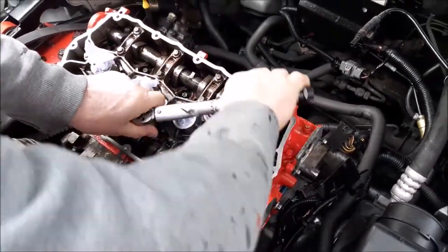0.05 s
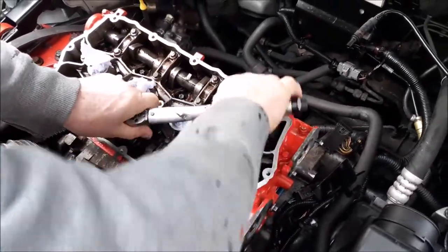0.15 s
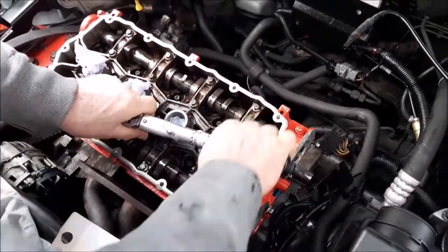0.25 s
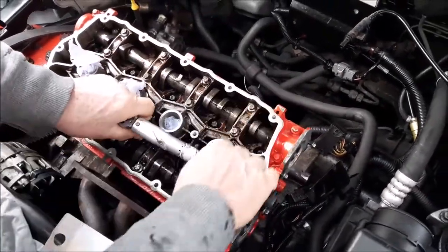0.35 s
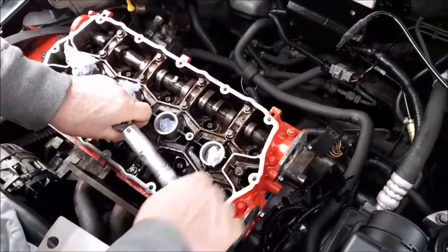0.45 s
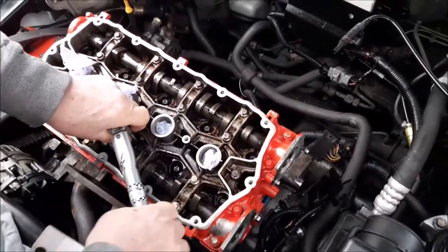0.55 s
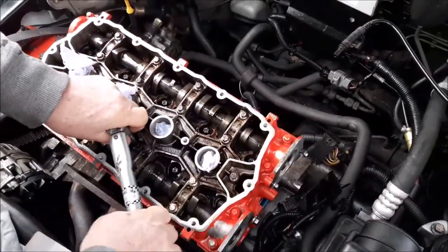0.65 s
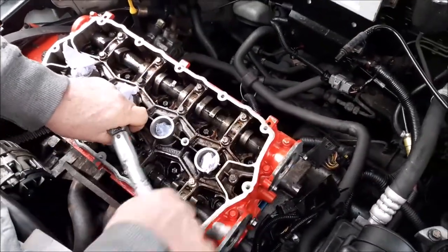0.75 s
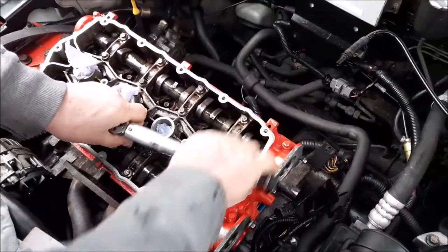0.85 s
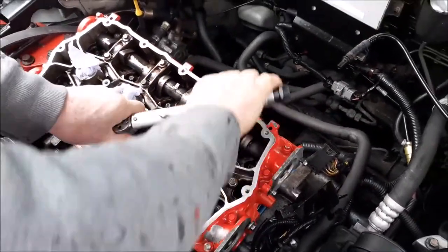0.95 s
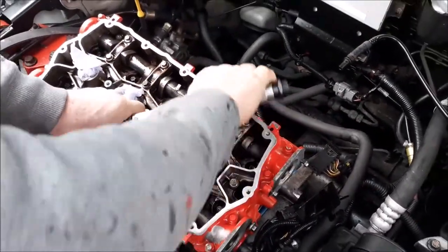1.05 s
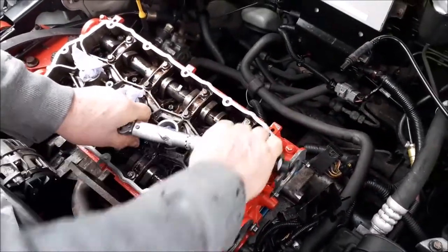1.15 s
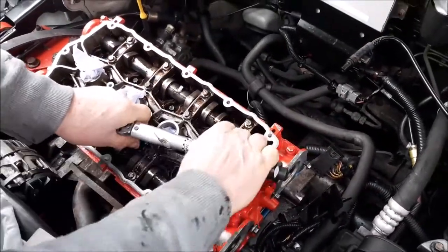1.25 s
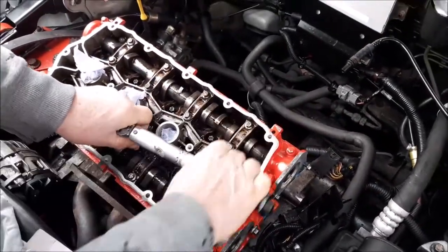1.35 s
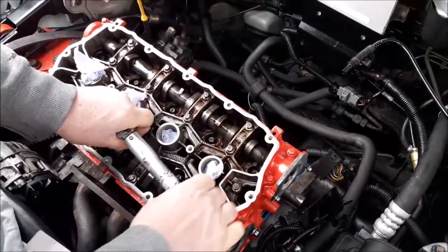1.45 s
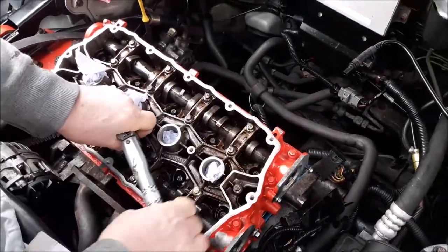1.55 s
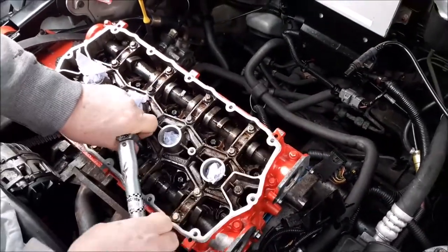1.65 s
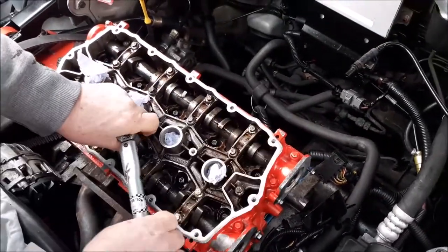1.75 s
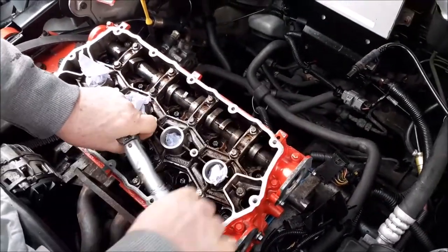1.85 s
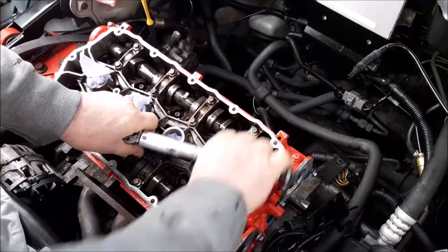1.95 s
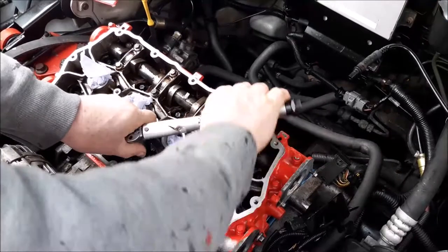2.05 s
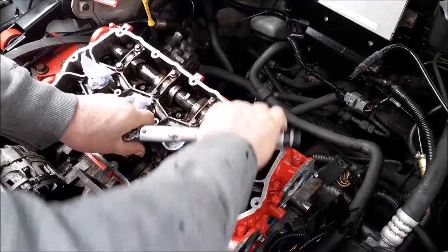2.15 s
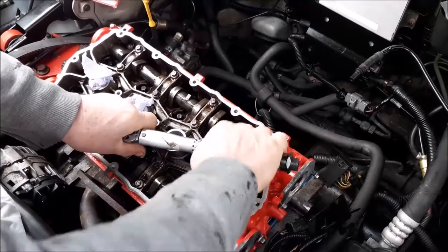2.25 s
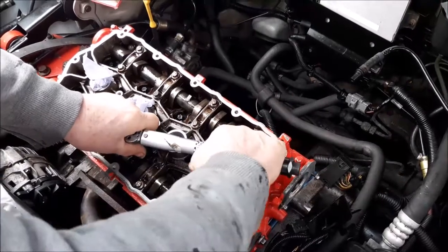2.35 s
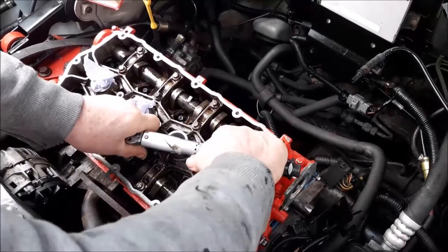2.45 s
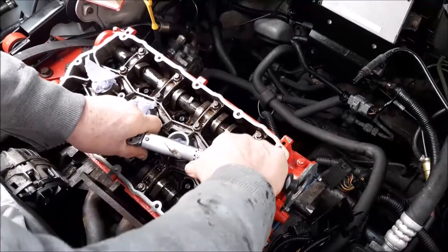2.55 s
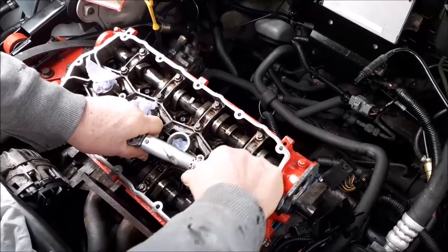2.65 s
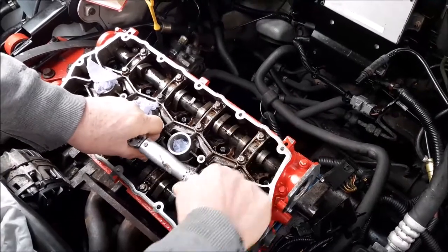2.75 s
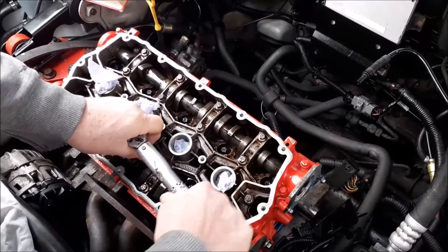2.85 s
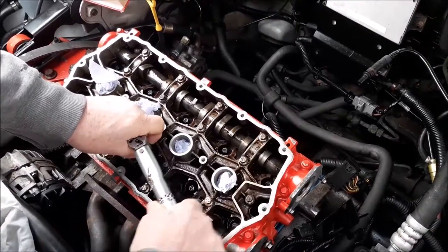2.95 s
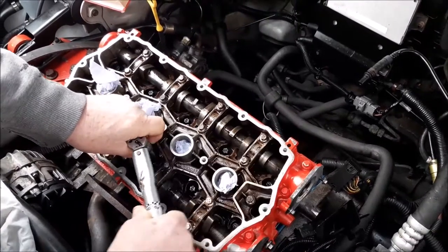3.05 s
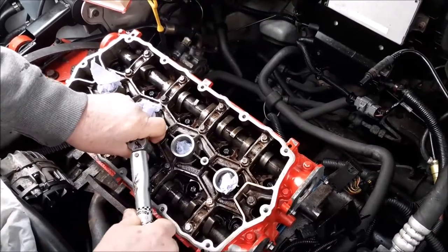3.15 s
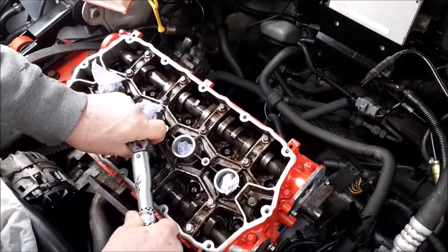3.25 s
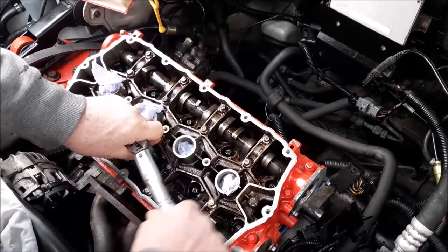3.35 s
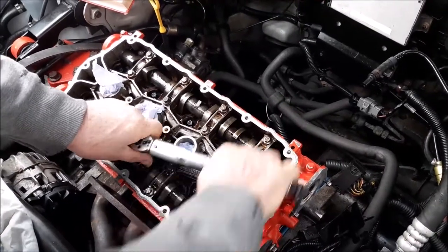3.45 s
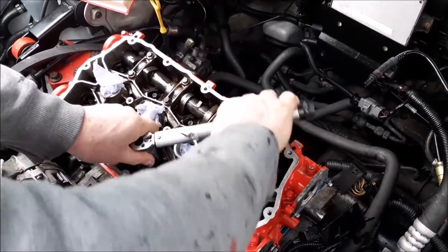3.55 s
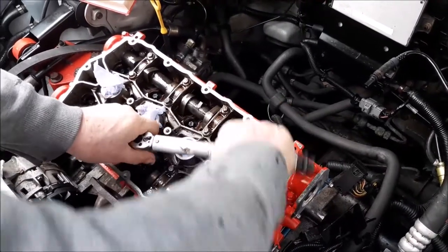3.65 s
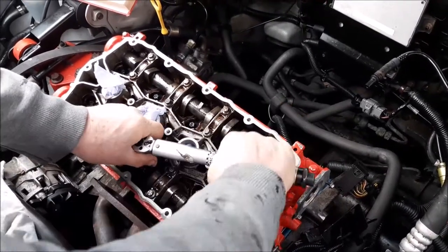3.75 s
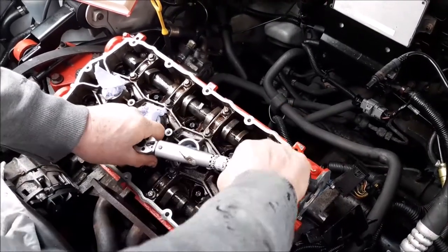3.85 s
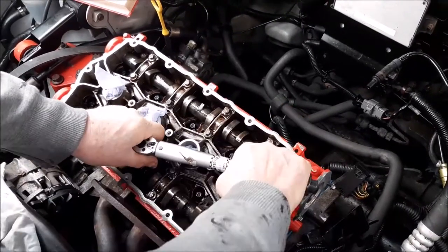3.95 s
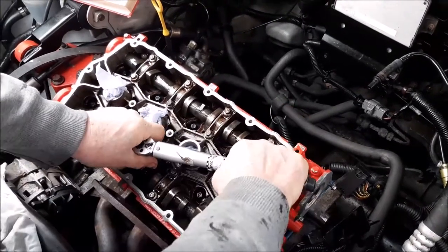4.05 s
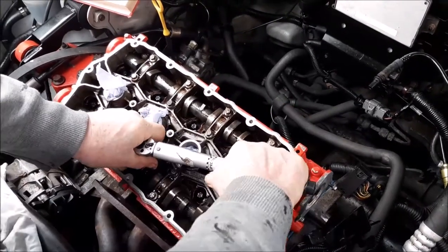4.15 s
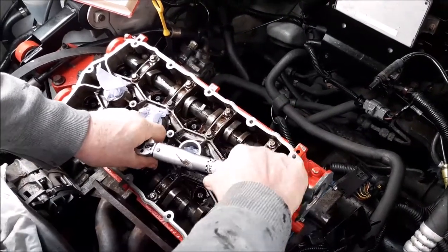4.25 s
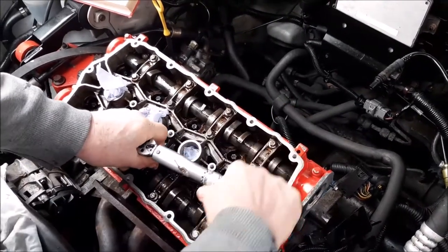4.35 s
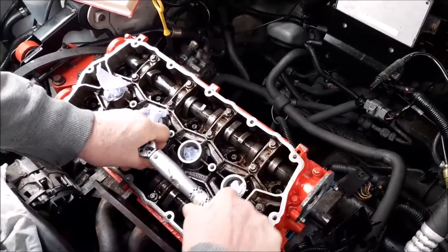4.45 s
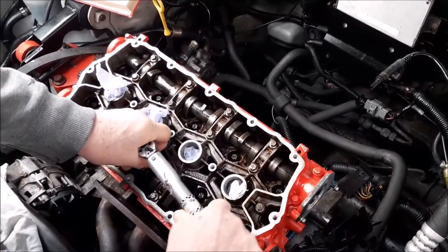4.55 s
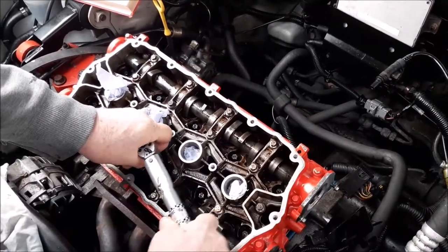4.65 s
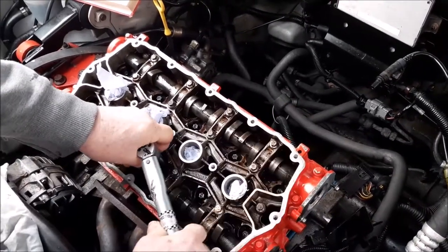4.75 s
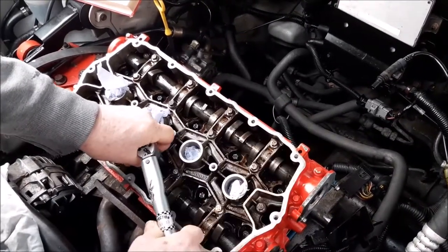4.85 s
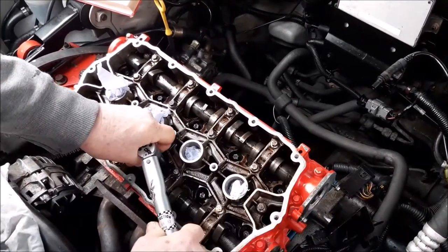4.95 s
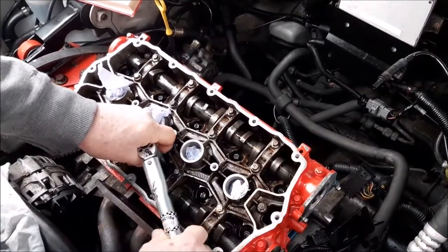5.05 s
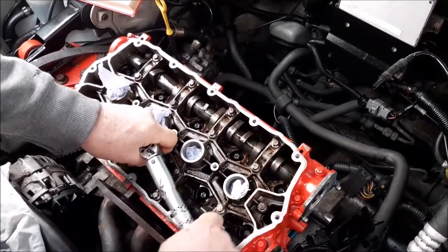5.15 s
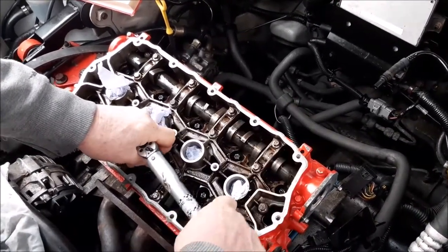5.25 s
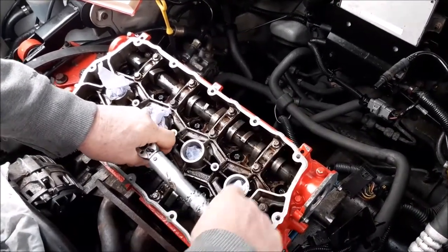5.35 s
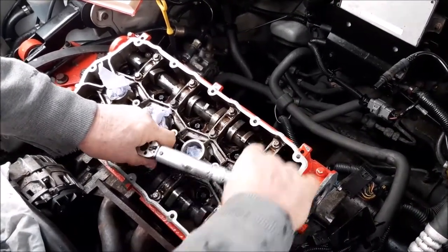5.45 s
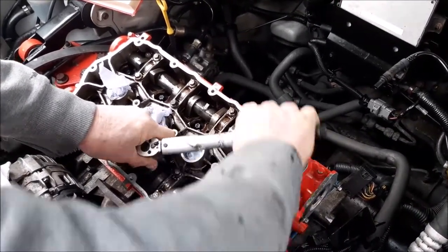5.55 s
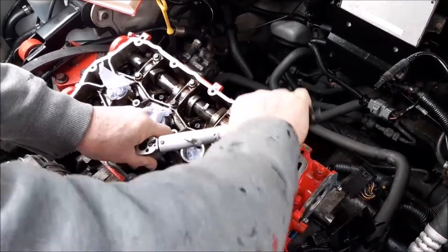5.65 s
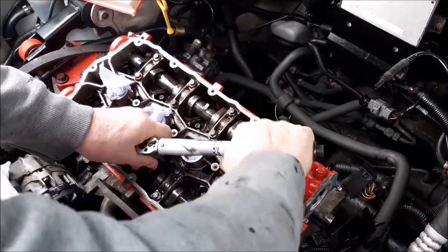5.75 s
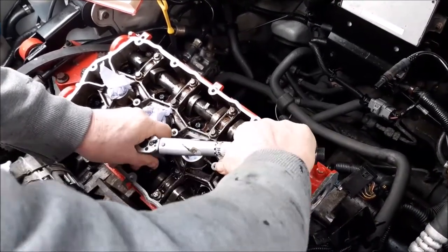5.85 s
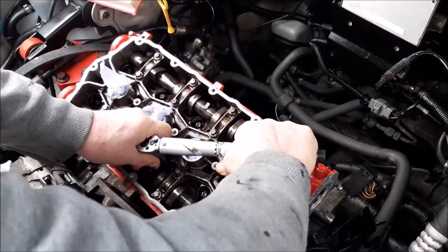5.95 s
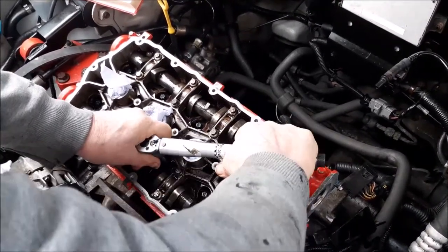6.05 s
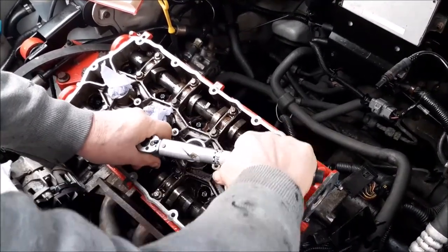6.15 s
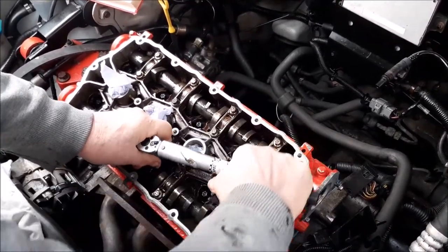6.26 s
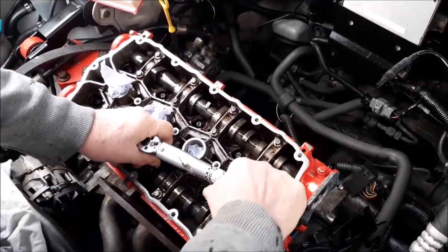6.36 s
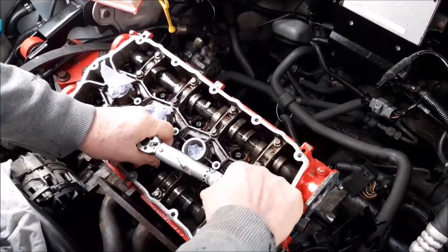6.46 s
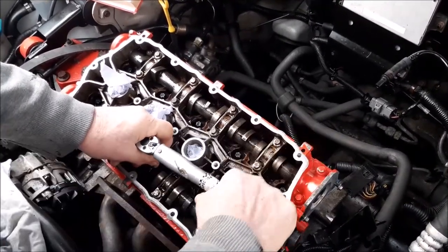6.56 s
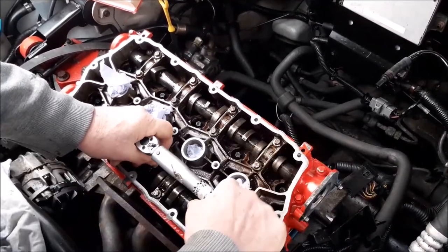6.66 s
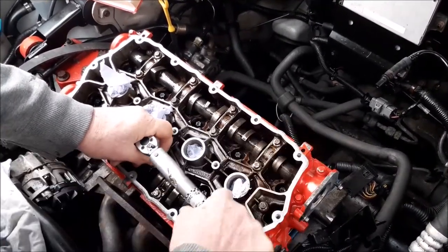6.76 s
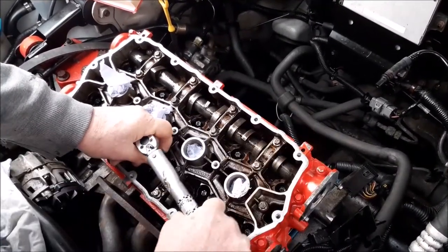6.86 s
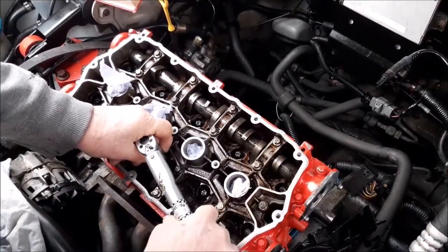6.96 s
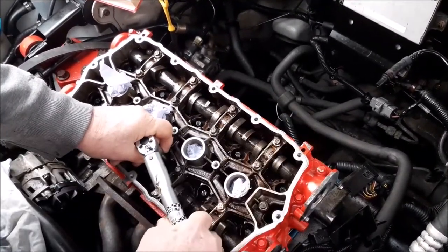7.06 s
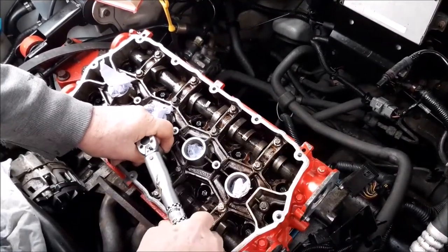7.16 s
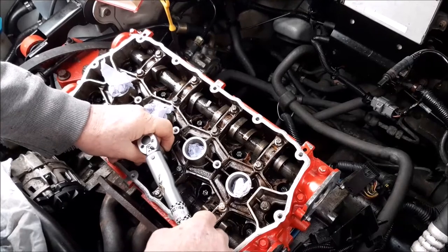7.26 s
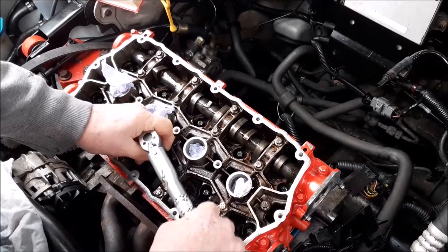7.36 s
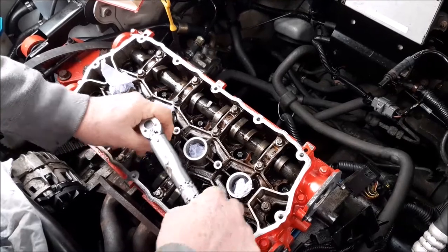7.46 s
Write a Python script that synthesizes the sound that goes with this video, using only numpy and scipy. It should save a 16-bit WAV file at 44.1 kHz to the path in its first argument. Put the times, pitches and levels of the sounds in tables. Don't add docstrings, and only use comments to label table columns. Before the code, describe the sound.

Two sharp ratchet clicks, a pause and a solid metal clunk, then four more clicks; the pattern of clicks and knocks repeats irregularly. Tiny socket ticks and scuffs fill the gaps over low car-body rumble and cloth rustle. The sound is close and slightly left, with only a short faint garage echo. Late on, a faint wavering motor tone swells beneath soft hiss, and one tiny tick ends it.

```python
import sys
import numpy as np
from scipy import signal
from scipy.fft import rfft, irfft
from scipy.io import wavfile
from scipy.ndimage import uniform_filter1d

SR = 44100
rng = np.random.default_rng(int(sys.argv[2]) if len(sys.argv) > 2 else 0)


def materialize(psi):
    bounded = np.clip(np.atleast_2d(psi).T, -1, 1)
    quanta = np.round(bounded * 32767).astype(np.int16)
    wavfile.write(sys.argv[1], SR, quanta)


def magnitude_from_level(level_db):
    exponent = np.asarray(level_db, float) / 20
    return 10 ** exponent


N = 330750

# start_s, peak_db, slip_db, bounce_db, top_ring_db
TOOTH_CLICKS = [(0.0247, -33.5, -11, -2.5, -9.5), (0.0772, -34.5, -7, -8, -10.5),
                (0.8602, -35, -15.5, -11, -5.5), (0.8968, -34, -13, -1, -9), (0.9377, -31, -12, -7.5, -8),
                (0.9815, -32.5, -9.5, 8, -8), (1.9346, -31.5, -12.5, -9, -9), (1.9735, -30, -10, 2.5, -4),
                (2.014, -29, -20, -11, -5), (2.0647, -32.5, -10.5, 1.5, -7), (3.4395, -32, -18, -3.5, -2.5),
                (3.474, -32.5, -12, -11, -6.5), (3.5119, -32, -8.5, 3, -8.5), (3.5543, -32, -10, -3.5, -7),
                (5.434, -36, -20, -15.5, -11), (5.4964, -33.5, -18, -10.5, -9),
                (5.5499, -33.5, -9.5, 0, -7.5), (5.6185, -36, -22, 2, -13)]
# start_s,
# peak_db, lower_body_db, chatter_s
SOCKET_TICKS = [(0.2663, -49, -18.5, 0.0083), (0.354, -67, -9, 0.02), (0.5797, -65, -6, 0.008),
                (0.6026, -63, -5, 0.024), (1.1722, -53, -15, 0.011), (1.177, -58.5, -19, 0.014),
                (1.225, -55, -14, 0.0036), (1.6829, -48.5, -16.5, 0.01), (1.837, -63, -26.5, 0.02),
                (1.9008, -58, -25.5, 0.0051), (2.221, -54, -8.5, 0.0069), (2.2612, -48.5, -16, 0.0079),
                (2.4972, -79, -37, 0.0058), (3.054, -71.5, -15, 0.0069), (3.1112, -55, -3.5, 0.0072),
                (3.143, -56, -6, 0.0091), (3.1592, -56.5, -4, 0.0065), (3.334, -50, -13.5, 0.003),
                (3.35, -53.5, -12.5, 0.011), (3.4012, -60.5, -33.5, 0.0089), (4.8245, -50, -2, 0.01),
                (4.885, -65, -7, 0.018), (5.141, -64.5, -15, 0.017), (5.6738, -60.5, -8, 0.02),
                (5.703, -66, 1, 0.011), (7.408, -71.5, -6, 0.028), (7.4779, -42, -12, 0.0052)]
# pitch_hz, width_hz, level_db
PAWL_MODES = [(4350, 37, -5), (5460, 210, -19.5), (5230, 51, -14), (7130, 130, -6.5), (8050, 220, 12),
              (8820, 215, -17), (9380, 91, -27), (10170, 107, -2), (12400, 113, -7), (13300, 98, -6),
              (14600, 56.8, -8), (15130, 150, 3)]
# frequency_hz, level_db (per Hz)
CLICK_COLOUR = [(590, -48), (1000, -22.5), (1620, -15.5), (2180, -10.5), (2970, -9), (4650, -4.5),
                (7110, -5.5), (11000, -5), (15000, 5.5), (15500, -7), (16800, -23)]
# start_s, peak_db, main_ring_hz, rattle_s
LOAD_KNOCKS = [(0.264, -51.5, 1050, 0.0074), (0.58, -31, 957, 0.0029), (0.597, -38.5, 500, 0.015),
               (1.177, -49, 1160, 0.02), (1.674, -30.5, 900, 0.0048), (1.764, -41, 658, 0.018),
               (1.894, -41.5, 478, 0.0046), (2.261, -49.5, 604, 0.012), (3.047, -51.5, 800, 0.014),
               (3.113, -32, 1110, 0.0028), (3.118, -28.5, 687, 0.0051), (3.159, -34.5, 570, 0.0043),
               (3.265, -57, 526, 0.012), (3.332, -30.5, 805, 0.0032), (3.340, -35, 645, 0.008),
               (3.953, -54.5, 930, .012), (4.823, -32, 1400, .004), (4.83, -29, 665, 0.0046),
               (5.001, -44, 690, 0.0058), (5.387, -59, 760, .01), (7.476, -44.5, 1320, 0.0054)]
# pitch_hz, level_db, t60_s
HANDLE_MODES = [(500, -1, 0.042), (605, -12, 0.072), (652, -1, 0.15), (790, -13.5, 0.043),
                (966, 0.5, 0.036), (1062, -2, 0.025), (1253, 0, 0.041), (1379, -1.5, 0.051),
                (1370, -25.5, 0.1), (1756, -8.5, 0.067), (2020, -10.5, 0.084), (2430, -19.5, 0.01)]
# start_s, peak_db, pitch_hz, t60_s
PANEL_THUMPS = [(0.581, -33.5, 121.4, 0.27), (0.612, -35.5, 105.8, 0.19), (.585, -45, 271, 0.26),
                (1.039, -49.5, 271.3, 0.33), (1.673, -35.5, 102.4, 0.24), (1.679, -48.5, 224.3, 0.25),
                (1.763, -49, 278, 0.29), (1.883, -35, 119.6, 0.084), (1.888, -43.5, 249, 0.056),
                (1.921, -39, 108.3, 0.086), (3.113, -44.5, 264, 0.48), (3.126, -43.5, 120.7, 0.5),
                (3.142, -33, 256.5, 0.2), (3.16, -43, 412, 0.076), (3.171, -47, 176.5, 0.31),
                (3.257, -44, 273, 0.11), (3.334, -54.5, 302, 0.45), (3.35, -38, 187, 0.11),
                (3.368, -42.5, 116.2, 0.39), (3.953, -51.5, 210.3, 0.34), (4.825, -38.5, 227, 0.15),
                (4.827, -44.5, 411, 0.18), (4.837, -41, 95, 0.34), (4.879, -44.5, 140, 0.1),
                (4.999, -58, 231, 0.21)]
# frequency_hz, t60_s
GARAGE_DECAY = [(100, 0.31), (500, 0.26), (2000, 0.27), (6000, 0.09), (16000, 0.0956)]
# start_s, length_s, level_db
LEANS = [(-.2, 1, -65.5), (.6, 0.99, -54.5), (1.8, 0.35, -52.5), (2.0, 0.55, -61), (2.6, 0.46, -57),
         (3.1, 0.18, -53), (3.25, .3, -51), (3.62, 0.75, -54), (3.95, 1, -62.5), (4.75, .4, -58),
         (5.3, 0.3, -74), (5.62, 0.41, -63), (6.15, 1, -69), (6.8, 0.68, -75.5)]
# frequency_hz, level_db (per Hz)
RUMBLE_COLOUR = [(25, -28.5), (50, -13.5), (75, 3), (115, -4.5), (180, -20.5), (280, -5.5), (400, -30.5),
                 (600, -40.5)]
# time_s, level_db
SLEEVE_MOTION = [(0, -59), (.41, -55.5), (.59, -61), (.8, -58), (1.5, -63.5), (1.85, -58), (2.03, -53.5),
                 (2.16, -61), (2.36, -60.5), (2.53, -68), (3.16, -70), (3.6, -65), (4.2, -69), (4.4, -61.5),
                 (4.89, -75.5), (5.43, -69), (5.73, -65.5), (6.02, -76.5), (7.5, -74.5)]
# frequency_hz, level_db (per Hz)
CLOTH_COLOUR = [(200, -29.5), (400, 2), (1000, 3), (1500, -5.5), (2500, -16.5), (5000, -22), (12000, -23),
                (17000, -23)]
# start_s, length_s, level_db
SCUFFS = [(-.04, 0.16, -62.5), (.57, .14, -68.5), (1.02, 0.14, -85), (1.72, 0.21, -72), (2.08, 0.092, -72),
          (2.2, 0.24, -73.5), (3.1, .13, -64.5), (3.57, 0.22, -69), (3.82, .12, -83), (3.95, .14, -84),
          (4.82, 0.13, -69.5), (5.64, 0.17, -69.5), (7.38, 0.29, -75.5)]
# frequency_hz, level_db (per Hz)
SKIN_COLOUR = [(1000, -29), (2300, 8.5), (4000, 9), (8000, 1.5), (12000, 4.5), (17000, -45.5)]
# start_s, length_s, level_db
MOTOR_SWELLS = [
    (-.1, 1.24, -74),
    (4.2, 0.58, -74.5),
    (4.95, 0.79, -78),
    (5.5, 0.43, -78),
    (5.9, 0.57, -70),
    (6.22, 0.68, -64),
    (6.6, 0.56, -65),
    (7.2, 0.82, -74),
]
# frequency_hz, level_db (per Hz)
AIR_COLOUR = [(20, -43.5), (40, -29), (62, 0.5), (105, 0), (180, -13), (300, -12.5), (500, -23.5),
              (1000, -24), (1700, -32.5), (3000, -39), (6500, -43.5), (7200, -40), (15500, -38.5),
              (16800, -66)]
# frequency_hz, likeness (0 to 1)
STEREO_LIKENESS = [(30, .9), (100, 0.91), (300, 0.62), (700, 0.18), (1500, 0.067), (4000, 0.087),
                   (16000, 0.028)]

LEAD_IN_S = 0.012
SWELL_PEAK, SCUFF_PEAK = 0.36, 0.17
SLIGHT_LEFT_DB = [[0.6], [-0.6]]


def read(points, hz):
    f, value = np.transpose(points)
    return np.interp(np.log(hz + 1), np.log(f + 1), value)


def add(mix, s, sound):
    part = mix[:, max(round(s * SR), 0):][:, :sound.shape[1]]
    part += sound[:, :part.shape[1]]


def placed(near, other, pan_db, share, lag):
    right = share * np.roll(near, lag) + np.sqrt(1 - share ** 2) * other
    return np.array([near, right]) * magnitude_from_level([[pan_db / 2], [-pan_db / 2]])


def burst(t, at, tau):
    return (t >= at) * np.exp(-np.maximum(t - at, 0) / min(tau, 0.018))


def click(db, low_db, top_db, pan_db, bounce_db, slip_db, lead_s, chatter_s, chatter_db):
    size = 4096
    t, hz = np.arange(size) / SR - LEAD_IN_S, np.fft.rfftfreq(size, 1 / SR)
    bounce_s = 0.0018 + 0.00022 * rng.random()
    force = magnitude_from_level(slip_db) * burst(t, -lead_s, 0.0065) * (t < 0)
    force += burst(t, 0, 0.00053)
    force += magnitude_from_level(bounce_db) * burst(t, bounce_s, 0.0033)
    force += magnitude_from_level(chatter_db) * burst(t, 0, chatter_s)

    colour = magnitude_from_level(read(CLICK_COLOUR, hz) + 11.5) + 0j
    for mode_hz, width_hz, mode_db in PAWL_MODES:
        detuned_hz = mode_hz * rng.uniform(0.97, 1.03)
        gain = magnitude_from_level(mode_db - 8 * rng.random())
        colour += gain / (1 + 2j * (hz - detuned_hz) / (3 * width_hz))
    colour *= magnitude_from_level(np.interp(hz, [3294, 5400, 9200, 12600], [low_db + 23, 0, 0, top_db + 2]))

    near, other = irfft(rfft(force * rng.standard_normal((2, size))) * colour)
    pair = placed(near, other, pan_db, share=0.55, lag=7)
    power = uniform_filter1d(pair.mean(0) ** 2, size=130)
    return magnitude_from_level(db) * pair / np.sqrt(power.max())


def ratchet():
    out = np.zeros((2, N))
    gaps_s = np.diff([row[0] for row in TOOTH_CLICKS], prepend=-1)
    for (s, db, slip_db, bounce_db, top_db), gap_s in zip(TOOTH_CLICKS, gaps_s):
        lead_s = np.interp(gap_s, [0.04, 0.0485], [0.004, 0.0075])
        tooth = click(db, -25, top_db, 1.9, bounce_db, slip_db, lead_s, chatter_s=0.0041, chatter_db=-1)
        add(out, s - LEAD_IN_S, tooth)
    return out


def socket():
    out = np.zeros((2, N))
    for s, db, low_db, chatter_s in SOCKET_TICKS:
        top_db = -16.5 + 0.17 * (db + 56)
        tick = click(db, low_db, top_db, pan_db=4.5, bounce_db=-13.5, slip_db=-11.5, lead_s=0.0022,
                     chatter_s=chatter_s, chatter_db=11)
        add(out, s - LEAD_IN_S, tick)
    return out


def knocks():
    out, t = np.zeros((2, N)), np.arange(SR // 5) / SR
    hz, mode_db, t60 = np.transpose(HANDLE_MODES)[:, :, None]
    for s, db, main_hz, rattle_s in LOAD_KNOCKS:
        force = np.exp(-t[:3000] / rattle_s) * rng.standard_normal((2, 3000))
        force[:, :12] -= 0.8

        tilt_db = -2.9 + 0.5 * np.log2(main_hz / 700)
        tilted_db = mode_db + tilt_db * np.log2(hz / 700) + rng.uniform(-0.9, 1, hz.shape)
        detuned_hz = hz * rng.uniform(0.94, 1.03, hz.shape)
        decay = magnitude_from_level(tilted_db - 60 * t / np.minimum(t60, 1 / 18))
        ring = (decay * np.sin(2 * np.pi * detuned_hz * t)).sum(0)

        main_t60 = min(36 / main_hz, 0.043)
        ring += magnitude_from_level(9.5 - 60 * t / main_t60) * np.sin(2 * np.pi * main_hz * t)
        ring += magnitude_from_level(3 - 60 * t / 0.02) * np.sin(2 * np.pi * 800 * t)
        handle = signal.fftconvolve(force, ring[None], axes=1)
        near, other = handle / abs(handle).max()
        add(out, s, magnitude_from_level(db + 5.5) * placed(near, other, pan_db=2.5, share=0.23, lag=11))
    return out


def thumps():
    out, t = np.zeros((2, N)), np.arange(SR // 2) / SR
    for s, db, hz, t60 in PANEL_THUMPS:
        pair = np.sin(2 * np.pi * hz * t)
        pair += 0.5 * np.sin(2 * np.pi * (1.17 * hz * t + rng.random()))
        rise = 1 - np.exp(-t * hz / 0.92)
        swing = magnitude_from_level(-60 * t / t60) * rise * pair
        add(out, s, magnitude_from_level(db) * swing / abs(swing).max() * magnitude_from_level(SLIGHT_LEFT_DB))
    return out


def garage(x):
    taps = np.zeros((2, SR // 2))
    at = np.arange(200, SR // 2 - 20, 20)
    at = at + rng.integers(0, 20, (2, len(at)))
    np.put_along_axis(taps, at, rng.choice([-1., 1.], at.shape), axis=1)
    hz, t, z = signal.stft(taps, SR, nperseg=256)
    decay = magnitude_from_level(-60 * t / read(GARAGE_DECAY, hz)[:, None])
    tail = signal.istft(z * decay, SR, nperseg=256)[1]
    return signal.fftconvolve(x, tail / np.linalg.norm(tail[0]), axes=1)[:, :N]


def evened(x):
    return x / np.sqrt(np.mean(x ** 2) + 1e-20)


def swells(rows, peak):
    t, power = np.arange(N) / SR, np.zeros(N)
    for s, length, db in rows:
        u = np.interp(t, [s, s + peak * length, s + length], [0, 0.5, 1])
        power += (magnitude_from_level(db) * np.sin(np.pi * u) ** 2) ** 2
    return np.sqrt(power)


def noise(colour, patchy_db):
    frames, hz = N // 256 + 5, np.fft.rfftfreq(1024, 1 / SR)
    a, b, c, d, patches = rng.standard_normal((frames, 513, 5)).T
    patches = uniform_filter1d(patches, size=8, axis=0)
    patches = evened(uniform_filter1d(patches, size=12, axis=1))
    same = read(STEREO_LIKENESS, hz)[:, None]
    left = a + 1j * b
    right = same * left + np.sqrt(1 - same ** 2) * (c + 1j * d)
    level_db = read(colour, hz)[:, None] + patchy_db * patches / (1 + hz[:, None] / 5600)
    z = np.array([left, right]) * magnitude_from_level(level_db)
    out = signal.istft(z, nperseg=1024, noverlap=768)[1][:, :N]
    return out / np.sqrt(np.mean(out.mean(0) ** 2))


def rumble():
    return magnitude_from_level(-1) * swells(LEANS, SWELL_PEAK) * noise(RUMBLE_COLOUR, patchy_db=2)


def rustle():
    motion_db = np.interp(np.arange(N) / SR, *np.transpose(SLEEVE_MOTION))
    return magnitude_from_level(motion_db - 5) * noise(CLOTH_COLOUR, patchy_db=5)


def scuff():
    return swells(SCUFFS, SCUFF_PEAK) * noise(SKIN_COLOUR, patchy_db=3.5)


def motor_hum():
    waver = 1 + 0.0073 * evened(uniform_filter1d(rng.standard_normal(N), size=3000))
    tone = np.sin(2 * np.pi * 378.4 * np.cumsum(waver) / SR)
    level = magnitude_from_level(-87.5) + swells(MOTOR_SWELLS, SWELL_PEAK)
    return np.sqrt(2) * level * tone * magnitude_from_level(SLIGHT_LEFT_DB)


def air():
    return magnitude_from_level(-63.5) * noise(AIR_COLOUR, patchy_db=2.5)


def scene():
    bright, dull, deep = ratchet() + socket(), knocks(), thumps()
    echoes = garage(magnitude_from_level(-13.5) * bright + magnitude_from_level(-12.5) * dull + magnitude_from_level(-16) * deep)
    background = rumble() + rustle() + scuff() + motor_hum() + air()
    return bright + dull + deep + echoes + background


def low_pass(x):
    return signal.sosfilt(signal.butter(12, 16990, fs=SR, output="sos"), x)


def record(dry):
    bass_cut = signal.butter(4, 46, "highpass", fs=SR, output="sos")
    top_cut = signal.firwin(255, 16100, window=("kaiser", 3), fs=SR)
    heard = signal.oaconvolve(signal.sosfilt(bass_cut, dry), top_cut[None], "same")
    return low_pass(heard)


dry = scene()
out = record(dry)
materialize(out)
```